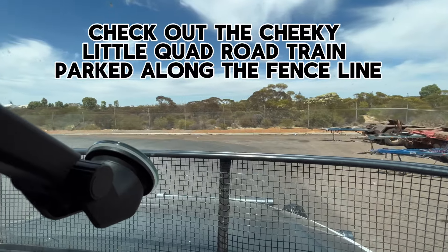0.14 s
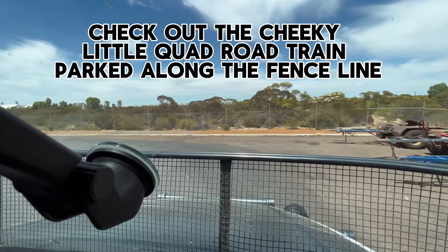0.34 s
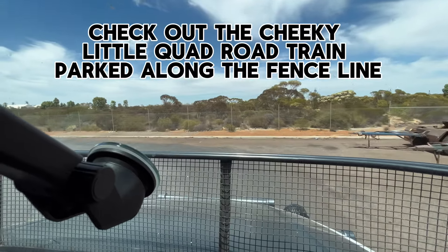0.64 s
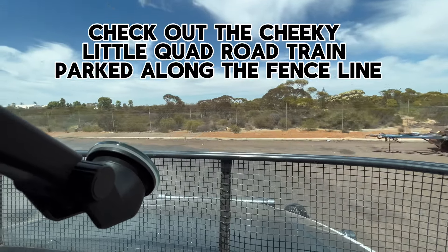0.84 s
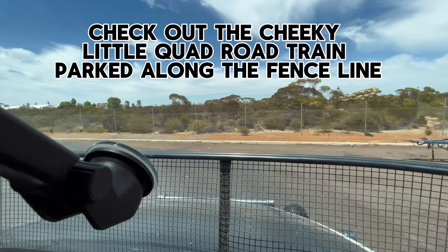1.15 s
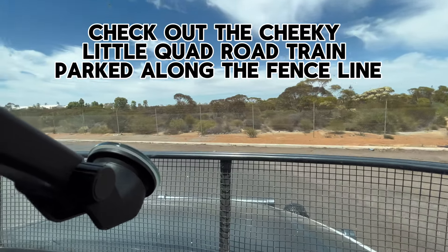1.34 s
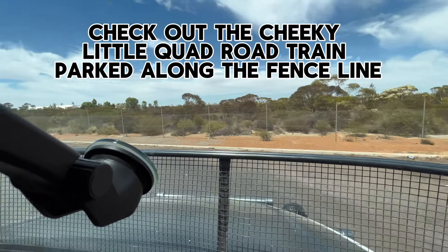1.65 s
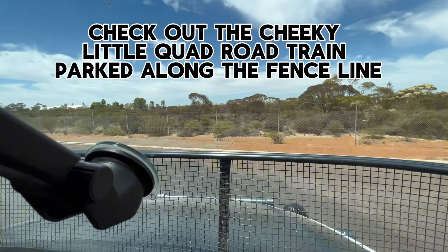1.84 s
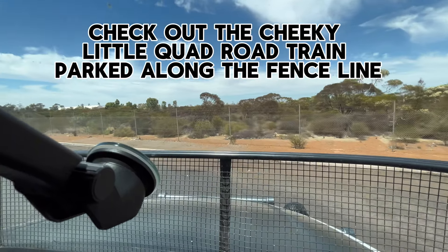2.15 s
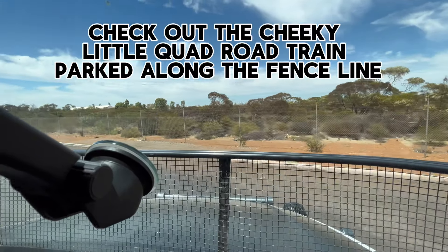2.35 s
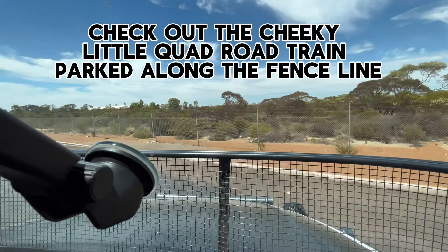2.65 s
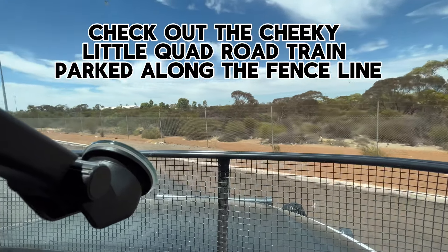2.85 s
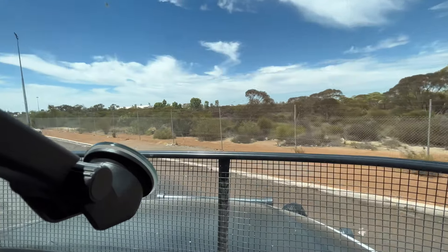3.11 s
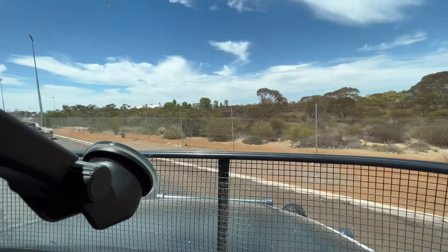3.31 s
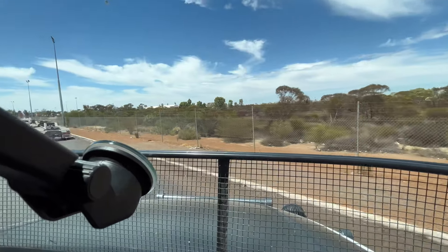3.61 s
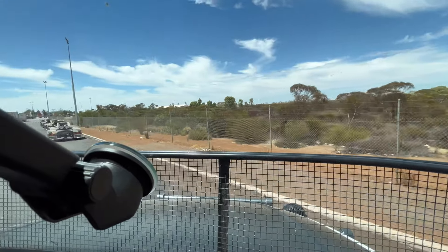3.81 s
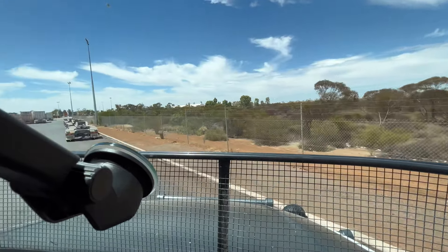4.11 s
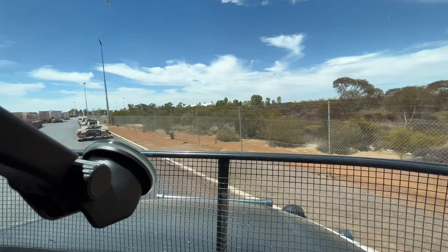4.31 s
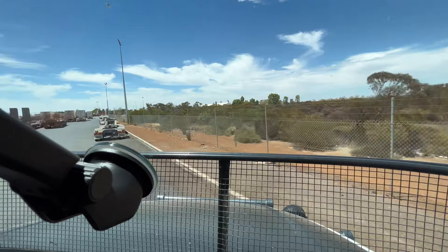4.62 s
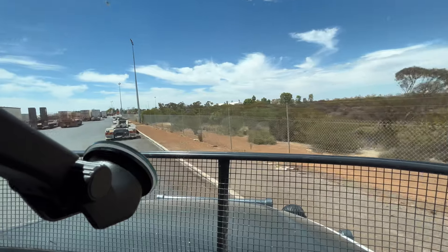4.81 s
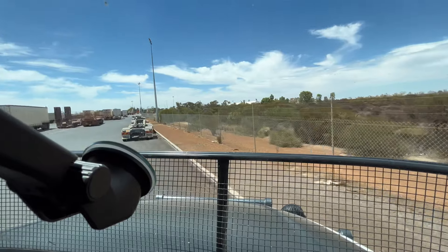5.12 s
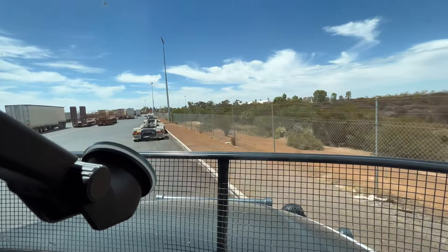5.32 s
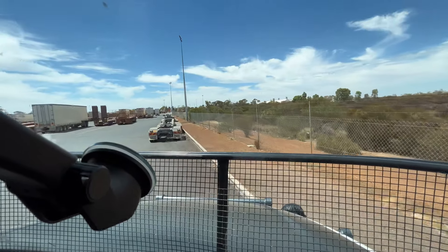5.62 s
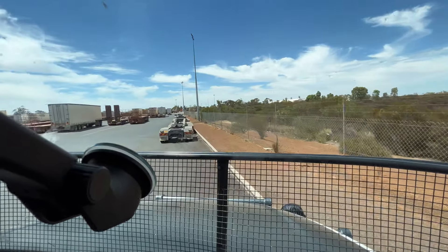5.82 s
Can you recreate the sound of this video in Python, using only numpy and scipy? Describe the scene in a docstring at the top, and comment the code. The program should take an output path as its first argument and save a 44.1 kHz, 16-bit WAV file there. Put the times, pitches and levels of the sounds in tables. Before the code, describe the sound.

A big diesel truck rolls slowly over a yard, heard from the cab: rumbling tyres, rattling fittings, and an engine growing louder and fuller.

```python
"""A low knock and thin clinks come first, over tyre rumble, then the boom of a six-cylinder diesel swells.
We are inside the cab of a heavy truck rolling slowly over a sealed yard, heard in stereo.
Engine and whines are tones locked to the firing rate, their levels wavering and their timing slipping.
Shudder, rumble, roar, squeal, clatter and hiss are shaped noise; most of their levels follow the throttle.
Loose fittings tick as noise bursts, and knock or ping as single dying modes."""
import sys
import numpy as np
from scipy import signal
from scipy.fft import rfft, irfft
from scipy.io import wavfile
from scipy.ndimage import uniform_filter1d

SR = 44100
rng = np.random.default_rng(int(sys.argv[2]) if len(sys.argv) > 2 else 0)


def level_to_linear(level):
    """Convert decibel levels to linear amplitude factors, elementwise."""
    exponent = np.asarray(level, float) / 20
    return 10 ** exponent


def digitize_waveform(pressure):
    """Quantize a signal to 16-bit integers and store it at the path in sys.argv[1].

    Rows of a 2-D input are taken as channels; values are limited to [-1, 1].
    """
    field = np.atleast_2d(pressure).T
    bounded = np.clip(field, -1, 1)
    quanta = np.round(bounded * 32767).astype(np.int16)
    wavfile.write(sys.argv[1], SR, quanta)


N = 262836

# engine speed: time_s, firing_rate_hz
FIRING_RATE = [(0, 55), (.1, 53.2), (.5, 51.8), (.9, 49.6), (1.03, 48.8), (1.3, 47.4), (1.42, 49.6),
               (1.64, 55.7), (1.8, 55.3), (2, 52.3), (2.4, 51.2), (2.58, 50.3), (2.8, 48.4), (3.05, 49.3),
               (3.18, 51), (3.45, 48.2), (3.7, 50), (3.85, 50.6), (4.1, 51.8), (4.86, 55.1), (4.98, 55.7),
               (5.12, 57.7), (5.62, 59.1), (5.96, 61.2)]
# how far the throttle is open: time_s, opening_0_to_1
THROTTLE_OPENING = [(0, 0.32), (.3, 0.19), (1.3, 0.1), (1.43, 0.72), (2.28, 0.69), (2.32, 0.3), (2.73, 0.2),
                    (2.76, 0.62), (3.5, 0.78), (3.9, 0.88), (4.25, 0.99), (5.96, 0.96)]
# firing tone in the cab, before dips and lope: time_s, level_db
FIRING_TONE = [(0, -36), (.4, -25), (.8, -29.5), (.9, -23.5), (1.25, -24.5), (1.5, -18), (1.72, -24),
               (2, -24), (2.22, -23.5), (2.5, -33), (2.78, -22), (2.9, -25.5), (3.35, -18), (3.7, -16),
               (4.3, -13.5), (5, -15), (5.2, -19.5), (5.96, -18.5)]
# chance dips in the level of the firing tone: centre_s, change_db, length_s (between 1/e points)
TONE_DIPS = [(0.1, -34, 0.11), (0.26, -23, 0.074), (0.46, -8, 0.085), (1.35, -16, 0.11),
             (1.806, -33, 0.079), (1.895, -17, 0.063), (4.844, -7, 0.043), (5.115, -11, 0.079),
             (5.323, -5, 0.047), (5.404, -13, 0.038), (5.692, -19, 0.041), (5.96, -27, 0.049)]
# higher engine orders: sixths_of_firing_rate (one sixth = one four-stroke cycle)
ORDER_SIXTHS = [5, 7, 8, 9, 10, 11, 13, 15, 17, 18, 20, 21, 22, 24, 26, 27, 28, 30, 33, 34, 36, 39, 40, 42,
                45, 46, 47, 48, 49, 50, 51]
# level of each order without load, before the cab's lift: level_db
UNLOADED_ORDERS = [-38, -40, -43, -36, -49, -47, -50, -47, -54, -51, -56, -60, -58, -47, -60, -62, -57, -54,
                   -60, -60, -55, -59, -59, -57, -58, -60, -60, -56, -57, -56, -60]
# level of each order under full load, before the cab's lift: level_db
LOADED_ORDERS = [-34, -36, -36, -34, -48, -39, -43, -38.5, -47, -39.5, -49, -56, -58, -44, -53, -57, -50,
                 -44, -54, -56, -48, -53, -52, -48, -51, -56, -55, -49, -46, -47, -52]
# air and panel resonances of the cab that lift a passing order: centre_hz, width_hz, lift_db
CAB_RESONANCES = [(71, 5, 8), (88, 8, 5), (145, 14, 4), (163, 16, 6), (213, 10, 9), (270, 16, 5),
                  (291, 10, 7), (310, 12, 12), (375, 25, 6), (432, 30, 5)]
# ringing panels heard in the noise: centre_hz, width_hz, lift_db
PANEL_RESONANCES = [(548, 97, 3), (744, 176, 11.5), (915, 210, 1.5), (1114.5, 72, 10.5), (1400, 326, 12),
                    (2933, 210, 5.5), (3402, 970, 13), (5130, 47, 13), (6500, 130, -2)]
# likeness and phase lead between left and right; nearly alike above 11 kHz:
# frequency_hz, likeness_0_to_1, left_lead_rad
STEREO_LIKENESS = [(60, .975, 0), (100, .88, .15), (170, .7, .3), (350, .62, 1.1), (500, .25, 2.4),
                   (900, .75, 3.1), (1150, .4, 3.3), (1600, .45, 3.6), (2100, .15, 5), (2800, .35, 7.8),
                   (4500, .2, 12.2), (7000, .4, 19), (8500, .2, 21), (10200, .55, 22), (11500, .75, 25.1),
                   (15000, .6, 25.1)]
# stereo balance, left louder through the middle: frequency_hz, left_minus_right_db
STEREO_LEAN = [(60, 1), (200, 1.3), (380, 2.6), (700, 2.5), (1290, 3), (2380, 3.5), (4400, 6), (8120, 0),
               (10000, -3), (15000, -1)]

# Noise colours; only the shape counts, since the levels are set where each noise is made.
# chassis shudder: frequency_hz, relative_db_per_hz
SHUDDER_COLOUR = [(25, -19), (32, -11), (40, -1), (48, 0), (62, 0), (80, -1), (100, -4), (130, -9),
                  (180, -20)]
# tyre rumble: frequency_hz, relative_db_per_hz
RUMBLE_COLOUR = [(70, -45), (110, 3), (150, -10), (200, 0), (250, -8.5), (300, -9.5), (450, -4), (520, -25),
                 (700, -61.5)]
# roar through firewall and doors: frequency_hz, relative_db_per_hz
ROAR_COLOUR = [(300, -14), (500, 1.5), (630, -5.5), (900, -3.5), (1500, -14.5), (1700, -11), (2300, -17),
               (3000, -64)]
# squealing trim: frequency_hz, relative_db_per_hz
SQUEAL_COLOUR = [(3300, -40), (3500, -10), (3585, 0), (3670, -10), (3900, -40)]
# combustion clatter: frequency_hz, relative_db_per_hz
CLATTER_COLOUR = [(1500, -6.5), (2400, -1.5), (3300, -7.5), (4200, -6), (5200, -4.5), (6500, -5),
                  (9000, -56)]
# injection hiss: frequency_hz, relative_db_per_hz
HISS_COLOUR = [(3500, -20), (5000, -4), (6500, -1), (7500, -3), (9600, -7), (10400, -13), (13000, -20),
               (13600, -28), (14800, -31), (15700, -33)]

# uneven ground shakes the chassis harder: start_s, end_s, added_db
GROUND_BUMPS = [(.6, 1.05, 3.5), (1.45, 1.6, 3), (2.72, 2.85, 2.5), (5.5, 5.96, 4.5)]
# spells in which the trim squeals: start_s, end_s, level_db
SQUEAL_TIMES = [(1.47, 1.53, -46.5), (3.25, 3.6, -52.5), (3.8, 4.05, -49.5), (4.1, 4.35, -51),
                (4.6, 5.4, -53.5)]
# gear and accessory whines: multiple_of_firing_rate, left_minus_right_db (on top of the stereo lean)
GEAR_WHINES = [(4.7, 2), (9.38, 5), (10.3, -4), (11.15, -3), (23.5, 0), (38.3, 0)]
# spells in which each whine is heard, one list per whine: start_s, end_s, level_db
WHINE_TIMES = [
    [(.3, 4.9, -48)],
    [(0, .5, -51), (2.3, 5.75, -47)],
    [(.95, 1.2, -48.5), (2.25, 3.2, -46), (3.9, 4.9, -47)],
    [(.95, 1.2, -54), (2.3, 3.95, -47)],
    [(1.0, 1.38, -48), (2.65, 3.05, -49), (3.35, 3.65, -45.5)],
    [(3.1, 3.9, -59), (4.6, 5.05, -58)],
]

# Noise bursts: level_db is rms before attack, crack and decay; half of pan_db becomes
# left minus right, on top of the stereo lean.
# broad ticks of loose fittings: start_s, level_db, centre_hz, t60_s, pan_db
FITTING_TICKS = [(.0765, -37, 10900, 0.053, -3), (.38, -41, 3500, .06, 3), (1.5235, -34, 3500, 0.07, -4),
                 (1.774, -45, 3000, .1, 5), (1.7838, -39, 4000, 0.11, 10), (1.796, -40, 3500, 0.11, 3),
                 (2.6, -40, 3500, .03, 0), (2.868, -40.5, 5000, 0.067, 4), (2.9694, -45, 7000, .037, -2),
                 (3.1946, -40.5, 7450, 0.044, 5), (3.2475, -39, 5000, 0.16, 2),
                 (3.7036, -31.5, 2500, 0.085, 3), (5.636, -32, 9700, 0.1, -2)]
# narrower clinks of small metal parts: start_s, level_db, centre_hz, t60_s, pan_db
METAL_CLINKS = [(.0094, -36, 4400, 0.13, 4), (0.016, -42, 8300, 0.066, -11),
                (1.6044, -36, 1590, 0.064, 4.5), (5.641, -37, 6550, 0.089, -2), (5.6535, -39, 6200, .05, 5),
                (4.5, -42, 3840, 0.032, -2)]
# Single modes: level_db is the amplitude before rise and decay.
# low knocks that ring a panel: start_s, level_db, pitch_hz, t60_s, left_minus_right_db
PANEL_THUMPS = [(0.0233, -23.5, 359, 0.14, 6), (1.5235, -25, 486, 0.03, 0), (1.6026, -22, 560, 0.054, 0),
                (1.6035, -29, 620, 0.05, 3), (1.8, -29, 1080, .03, 3), (1.07, -31.5, 390, 0.21, 2),
                (3.693, -26, 240, .15, 1), (1.519, -29, 640, 0.053, 0)]
# sharp strikes on a small metal part: start_s, level_db, pitch_hz, t60_s, left_minus_right_db
METAL_PINGS = [(3.7045, -31, 3600, .012, 3), (5.6375, -14, 6900, .005, -2), (5.639, -15, 6400, .005, -2)]


def evened(x):
    """Scales to rms 1."""
    return x / np.sqrt(np.mean(x ** 2) + 1e-20)


def over_hz(points, hz):
    """Reads a spectrum table on a log-frequency axis."""
    table_hz, value = np.transpose(points)
    return np.interp(np.log(hz + 1), np.log(table_hz + 1), value)


def over_time(points, t):
    """Reads every column of a curve table."""
    table_s, *columns = np.transpose(points)
    return [np.interp(t, table_s, column) for column in columns]


def clock():
    """Time of every sample in seconds."""
    return np.arange(N) / SR


def throttle():
    """Throttle opening at every sample, 0-1."""
    return np.clip(over_time(THROTTLE_OPENING, clock())[0], 0, 1)


def firing_turns():
    """Running count of firings at every sample, with the firing rate in Hz."""
    hz, = over_time(FIRING_RATE, clock())
    return np.cumsum(hz) / SR, hz


def between(ends_db, share):
    """Level part way from the first to the second value."""
    return ends_db[0] + (ends_db[1] - ends_db[0]) * share


def spells_db(spells, fade_s, rest_db):
    """Level that rises from rest to each spell, holds and falls back."""
    t = clock()
    lifts = []
    for start_s, end_s, db in spells:
        inside = np.clip(np.minimum(t - start_s, end_s - t) / fade_s + .5, 0, 1)
        lifts.append(inside * (db - rest_db))
    return rest_db + np.max(lifts, axis=0)


def lift_db(modes, hz):
    """Sum of bell-shaped resonance lifts, each halved in dB at the edges of its width."""
    return sum(db / (1 + (2 * (hz - mode_hz) / width_hz) ** 2) for mode_hz, width_hz, db in modes)


def wander(t, fastest_hz):
    """Slow chance of rms 1: sines of random phase, slower ones larger."""
    rates = np.geomspace(fastest_hz / 20, fastest_hz, num=16)[:, None]
    phases = rng.random(rates.shape)
    sines = np.sin(2 * np.pi * (rates * t + phases)) / np.sqrt(rates)
    return evened(sines.sum(0))


def stereo(left, other, hz):
    """The right takes part of the left with a phase lag and part of another signal; then the lean."""
    table_hz, likeness, lead = np.transpose(STEREO_LIKENESS)
    same = np.interp(hz, table_hz, likeness)
    lag = np.interp(hz, table_hz, lead)
    right = same * np.exp(-1j * lag) * left + np.sqrt(1 - same ** 2) * other
    lean = level_to_linear(over_hz(STEREO_LEAN, hz) / 2)
    return np.array([left * lean, right / lean])


def noise(spectrum, level_db, size, patchy_db, flicker_db):
    """Random short-time spectra with panel resonances, drifting patches and a shared flicker."""
    hop = size // 4
    frames, hz = N // hop + 5, np.fft.rfftfreq(size, 1 / SR)[:, None]
    a, b, c, d, patches = rng.standard_normal((frames, len(hz), 5)).T
    patches = uniform_filter1d(patches, size // 100, 0)  # smooth over frequency
    patches = evened(uniform_filter1d(patches, 3000 // hop + 1, 1))  # smooth over time
    flicker = evened(uniform_filter1d(rng.standard_normal(frames), 1000 // hop + 1))
    field_db = over_hz(spectrum, hz) + lift_db(PANEL_RESONANCES, hz)
    field_db = field_db + patchy_db * patches + flicker_db * flicker
    field_db -= 24 * np.log2(np.maximum(hz / spectrum[-1][0], 1))  # dB per octave above the table
    z = stereo(a + 1j * b, c + 1j * d, hz) * level_to_linear(field_db)
    sound = signal.istft(z, nperseg=size, noverlap=size - hop)[1][:, :N]
    return evened(sound) * level_to_linear(level_db)


def wavering(t, hz, turns, db, waver_db, slip_turns):
    """A stereo tone whose level wavers and whose timing slips."""
    coarse = t[::200]
    waver, slip, apart = (np.interp(t, coarse, wander(coarse, 9.)) for _ in range(3))
    phase = turns + slip_turns * slip + rng.random()
    wave = np.sqrt(2) * level_to_linear(db + waver_db * waver) * np.exp(2j * np.pi * phase)
    other = wave * np.exp(.7j * apart)  # the same tone with a drifting phase
    return stereo(wave, other, hz).real


def road():
    """The chassis shudders over the ground and the tyres rumble through the floor."""
    opening = throttle()
    # level pairs: throttle shut, wide open
    shudder_db = between((-27, -31), opening) + spells_db(GROUND_BUMPS, fade_s=.1, rest_db=0)
    rumble_db = between((-35.5, -30.5), opening)
    shudder = noise(SHUDDER_COLOUR, shudder_db, size=4096, patchy_db=1.2, flicker_db=.6)
    rumble = noise(RUMBLE_COLOUR, rumble_db, size=4096, patchy_db=0.73, flicker_db=.8)
    return shudder + rumble


def panels():
    """Engine and road roar through the firewall and doors, with a squealing trim part."""
    squeal_db = spells_db(SQUEAL_TIMES, fade_s=0.053, rest_db=-64.5)
    squeal = noise(SQUEAL_COLOUR, squeal_db, size=1024, patchy_db=.8, flicker_db=1.)
    roar_db = between((-40.5, -33.5), throttle())  # throttle shut, wide open
    roar = noise(ROAR_COLOUR, roar_db, size=2048, patchy_db=1.1, flicker_db=-0.46)
    return squeal + roar


def whines():
    """Thin gear tones that glide with the engine speed and come and go."""
    t, (turns, hz) = clock(), firing_turns()
    out = np.zeros((2, N))
    for (multiple, pan_db), spells in zip(GEAR_WHINES, WHINE_TIMES):
        level_db = spells_db(spells, fade_s=0.18, rest_db=-65.5)
        tone = wavering(t, multiple * hz, multiple * turns, level_db, waver_db=1.8, slip_turns=.08)
        out += tone * level_to_linear([[pan_db / 2], [-pan_db / 2]])
    return out


def knocks(rows, width_hz, tilt_db=0):
    """Each knock is a burst of noise around its centre with a sharp start and a dying tail."""
    crack, crack_s, attack_s = 1.2, .002, 0.00045  # crack: extra strength of the first moment
    out, t = np.zeros((2, N)), np.arange(8192) / SR
    hz = np.fft.rfftfreq(len(t), 1 / SR)
    bursts = rng.standard_normal((len(rows), 2, len(t)))
    for burst, (start_s, db, centre_hz, t60_s, pan_db) in zip(bursts, rows):
        tilt = level_to_linear(tilt_db * np.log2(hz / 1000 + 1))  # nears tilt_db per octave well above 1 kHz
        band = tilt / (1 + (2 * (hz - centre_hz) / width_hz) ** 4)
        band = band / (1 + (hz / 13600) ** 30)  # little above 13.6 kHz
        left, other = rfft(burst) * band
        sound = evened(irfft(stereo(left, other, hz)))
        sound = sound * level_to_linear(db - 60 * t / t60_s) * (1 - np.exp(-t / attack_s))
        sound = sound * (1 + crack * np.exp(-t / crack_s))
        part = out[:, round(start_s * SR):][:, :len(t)]
        part += (sound * level_to_linear([[pan_db / 4], [-pan_db / 4]]))[:, :part.shape[1]]
    return out


def rings(rows, rise_s):
    """Each blow is one mode dying away."""
    out, t = np.zeros((2, N)), np.arange(8192) / SR
    for start_s, db, pitch_hz, t60_s, pan_db in rows:
        ring = level_to_linear(db - 60 * t / t60_s) * np.sin(2 * np.pi * pitch_hz * t) * (1 - np.exp(-t / rise_s))
        out[:, round(start_s * SR):][:, :len(t)] += ring * level_to_linear([[pan_db / 2], [-pan_db / 2]])
    return out


def fittings():
    """Loose fittings tick and clink as noise bursts; panels and metal parts ring as single modes."""
    # ticks carry more body than treble
    bursts = knocks(FITTING_TICKS, width_hz=13200, tilt_db=-5.5) + knocks(METAL_CLINKS, width_hz=2500)
    return bursts + rings(PANEL_THUMPS, rise_s=0.00052) + rings(METAL_PINGS, rise_s=0.00042)


def clatter():
    """Combustion clatter and injection hiss, pulsing faintly with every firing."""
    turns, hz = firing_turns()
    opening = throttle()
    # level pairs: throttle shut, wide open
    hiss_db = between((-58.5, -50), opening)
    # the clatter also grows by 0.16 dB per Hz of firing rate above 50.4 Hz
    clatter_db = between((-48, -44), opening) + 0.16 * (hz - 50.4)
    hiss = noise(HISS_COLOUR, hiss_db, size=512, patchy_db=1.2, flicker_db=1.07)
    combustion = noise(CLATTER_COLOUR, clatter_db, size=512, patchy_db=1.2, flicker_db=0.82)
    pulse = 1 + 0.02 * np.cos(2 * np.pi * turns)
    return pulse * (hiss + combustion)


def engine():
    """Firing tone, its octave and higher orders lifted by the cab resonances; high orders slip more."""
    t, (turns, hz) = clock(), firing_turns()
    load = throttle() ** 6  # only a nearly full throttle loads the engine
    tone_db = over_time(FIRING_TONE, t)[0]
    for centre_s, change_db, length_s in TONE_DIPS:
        tone_db = tone_db + change_db * np.exp(-(2 * (t - centre_s) / length_s) ** 2)

    # each voice: multiple of the firing rate, level in dB, waver in dB
    voices = [(1, tone_db, 1.1), (2, between((-30.5, -34.5), load), 3.)]
    for sixths, idle_db, loaded_db in zip(ORDER_SIXTHS, UNLOADED_ORDERS, LOADED_ORDERS):
        order = sixths / 6
        order_db = between((idle_db, loaded_db), load) + lift_db(CAB_RESONANCES, order * hz)
        voices.append((order, order_db, 2.6))
    tones = sum(wavering(t, k * hz, k * turns, db, waver_db, slip_turns=.015 * k)
                for k, db, waver_db in voices)

    # firings differ in strength, less so under load, which makes the engine lope
    firings = np.arange(int(turns[-1]) + 2)
    strength = np.interp(turns, firings, rng.standard_normal(len(firings)))
    lope = level_to_linear(1.3 * (1 - .6 * load) * strength)
    return lope * tones


def scene():
    """Everything heard in the cab."""
    return road() + panels() + whines() + fittings() + clatter() + engine()


def top_cut(x):
    """Nothing passes above the cut-off."""
    return signal.sosfilt(signal.butter(12, 15860, fs=SR, output="sos"), x)


def record(dry):
    """The microphone in the cab cuts the deepest bass, below 30 Hz."""
    bass_cut = signal.butter(2, 30., "high", fs=SR, output="sos")
    mix = signal.sosfilt(bass_cut, dry)
    return top_cut(mix)


dry = scene()
out = record(dry)
digitize_waveform(out)
```